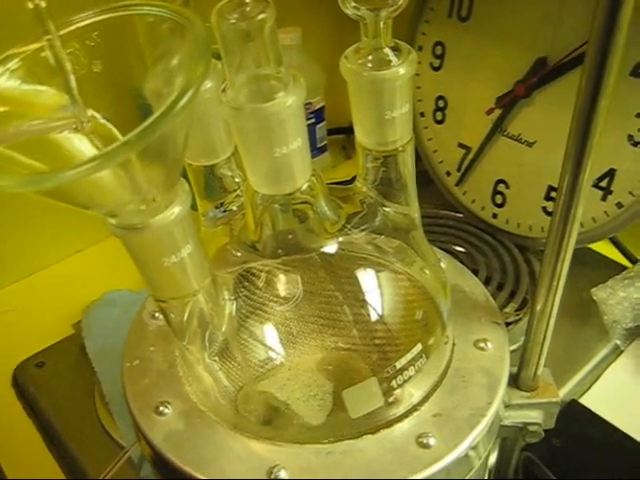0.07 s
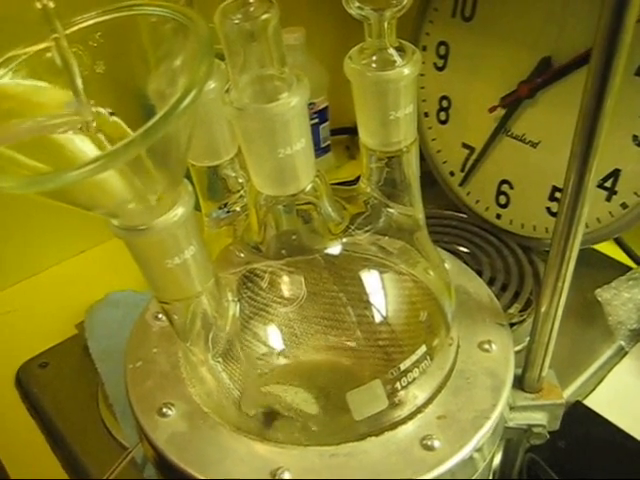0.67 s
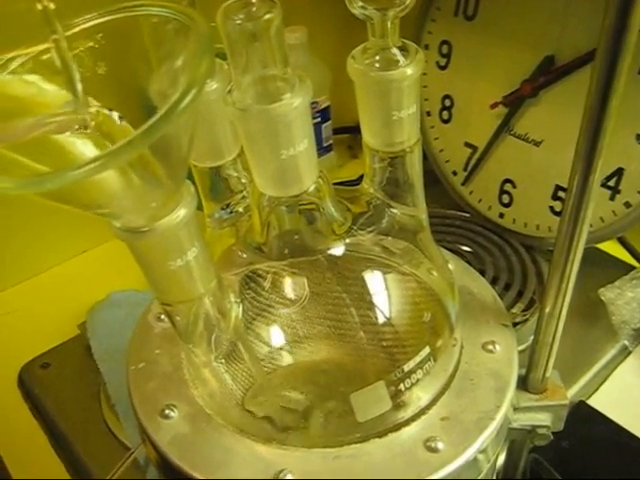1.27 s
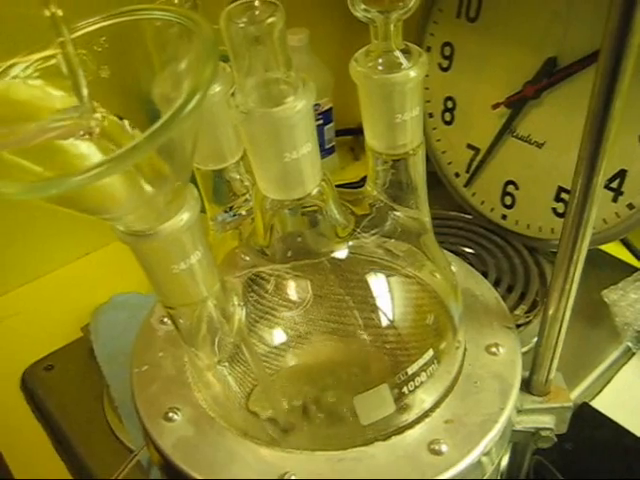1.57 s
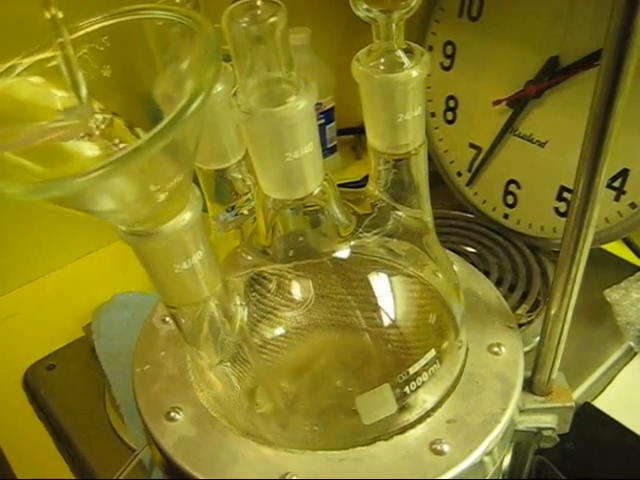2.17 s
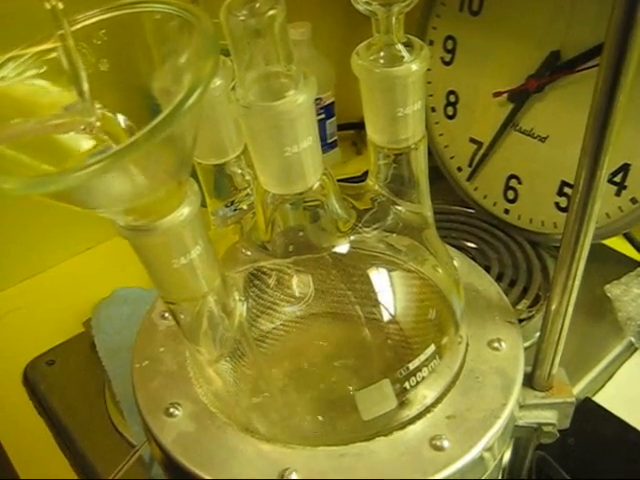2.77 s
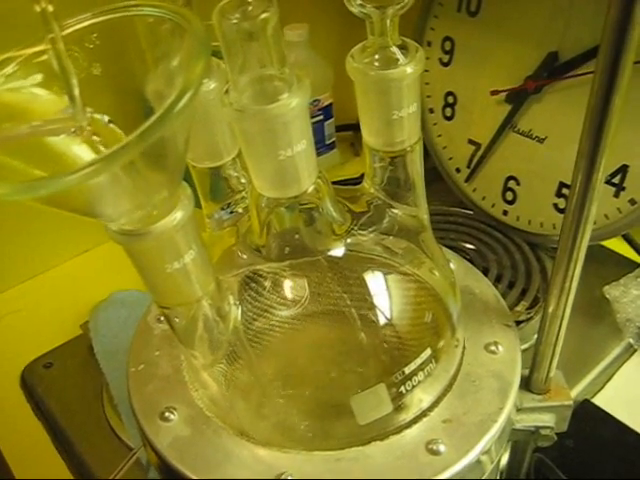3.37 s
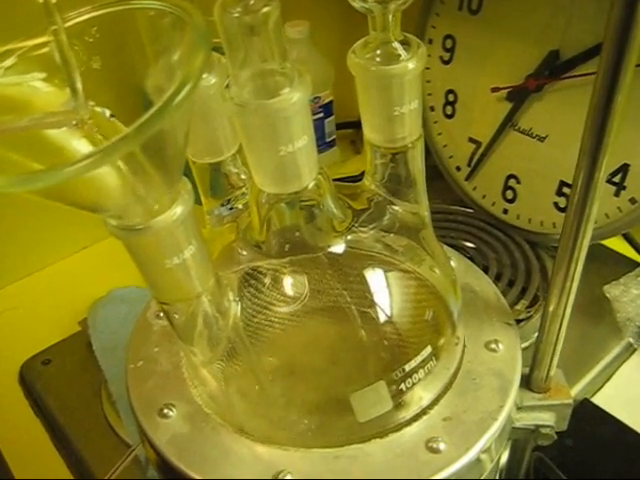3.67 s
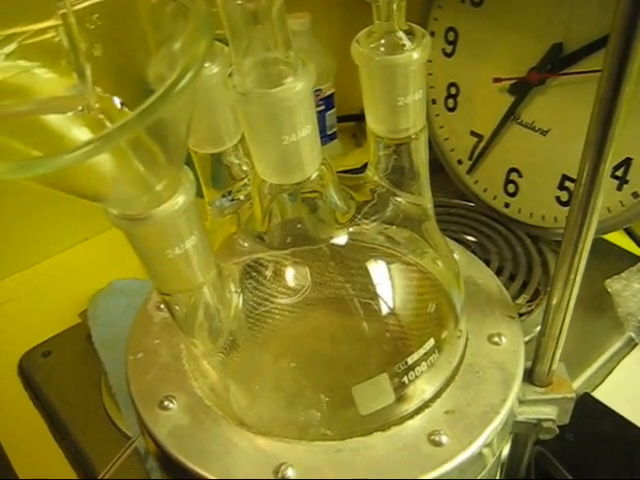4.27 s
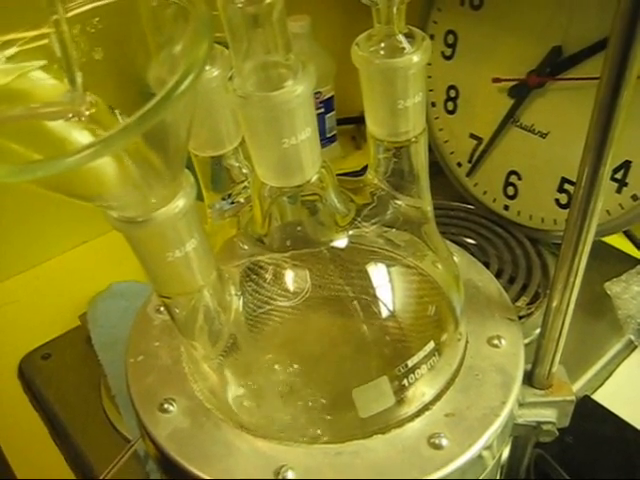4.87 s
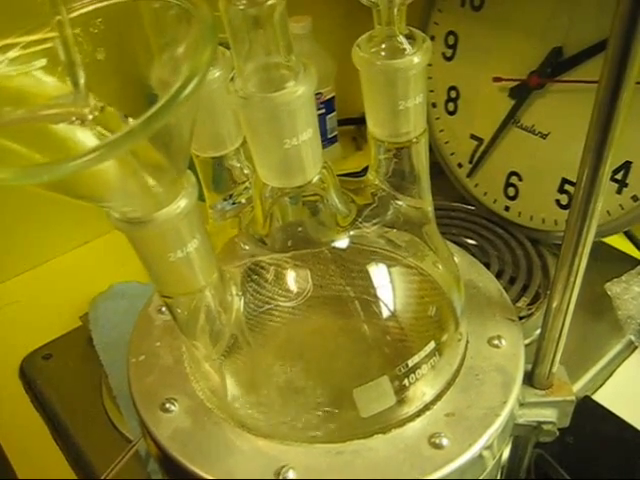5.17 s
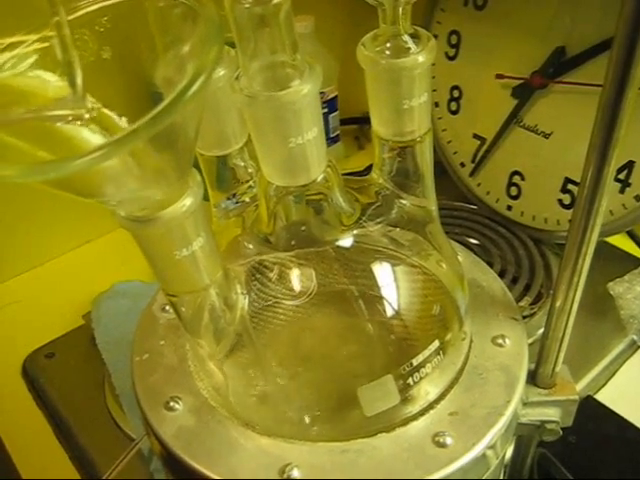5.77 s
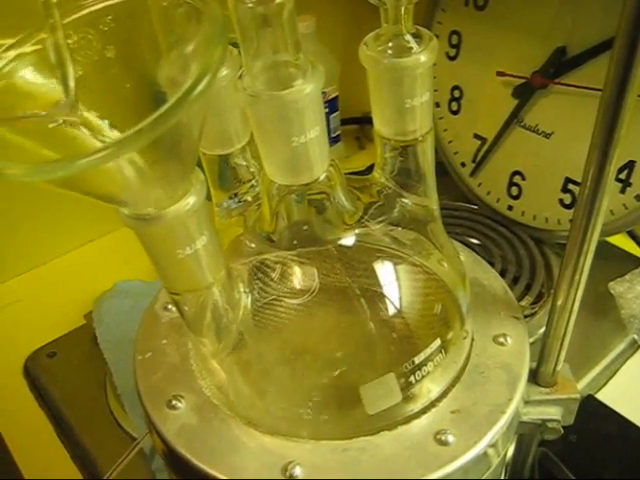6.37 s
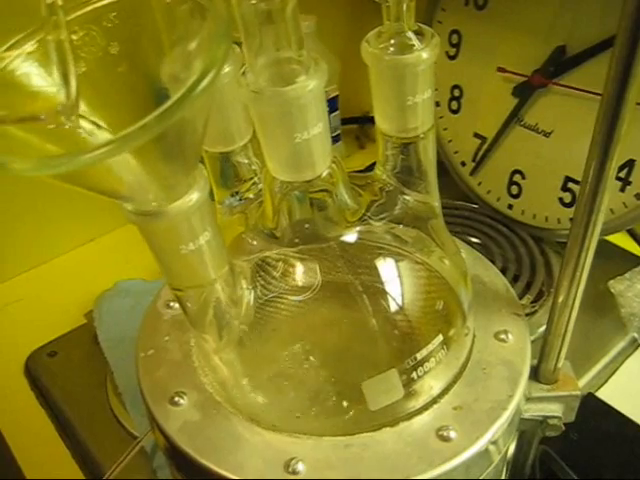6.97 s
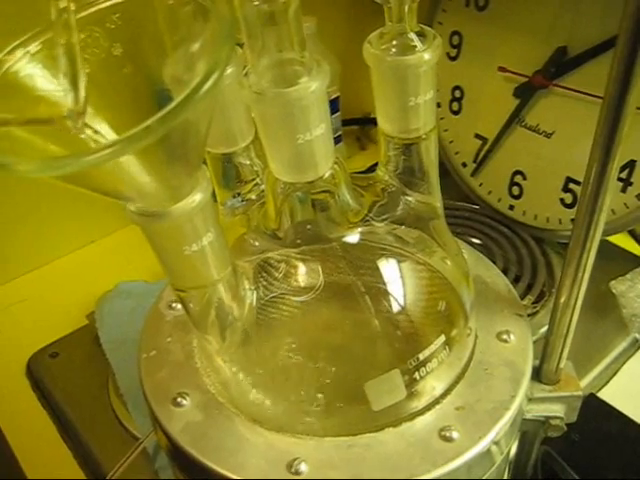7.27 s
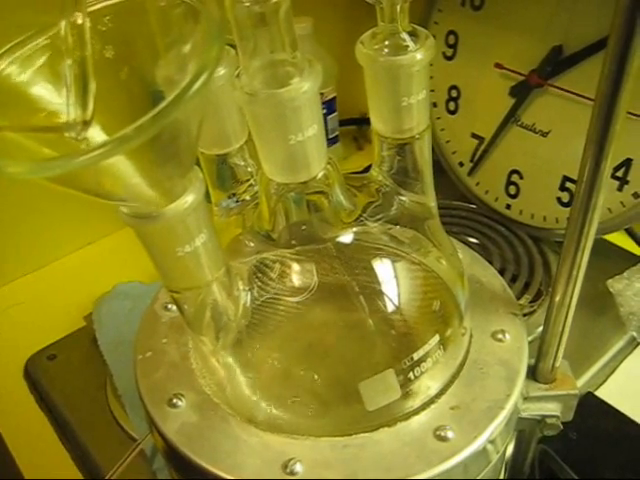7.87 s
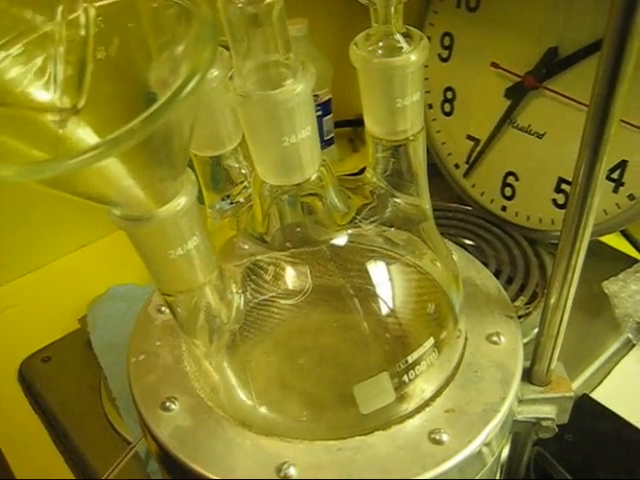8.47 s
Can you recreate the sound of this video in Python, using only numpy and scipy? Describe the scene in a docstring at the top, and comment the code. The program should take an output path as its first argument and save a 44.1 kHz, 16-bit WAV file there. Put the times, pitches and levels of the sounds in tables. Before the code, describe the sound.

Liquid trickles through a glass funnel into a flask, pattering and gurgling, with sharp glass clinks over a fume hood's hiss.

```python
"""A fume hood hisses throughout, and a small geared motor chirrs about eight times a second.
Right away, liquid trickles from a beaker through a glass funnel into a flask: drops patter on the funnel
and trap small ringing bubbles. Near 2 s the run-off gurgles, and soon the beaker clinks on the funnel.
From 3.5 s more pours follow, with more gurgling. From 5.8 s the beaker knocks the funnel again, harder.
The pouring stops near 7 s, and a last rising gurgle follows the final clinks."""
import sys
import numpy as np
from scipy import signal
from scipy.fft import rfft, irfft, next_fast_len
from scipy.io import wavfile

SR = 44100
rng = np.random.default_rng(int(sys.argv[2]) if len(sys.argv) > 2 else 0)


def master(y):
    """Save y as 16-bit WAV."""
    cut = np.clip(np.atleast_2d(y).T, -1, 1)
    pcm = np.round(cut * 32767)  # scale
    wavfile.write(sys.argv[1], SR, pcm.astype(np.int16))


N = 384111
TIME = np.arange(N) / SR

# Levels in the tables are relative. A fade_s is the time a ring takes to fall by 60 dB.
# Tone colour of the hood's hiss: pitch_hz, level_db
HOOD_COLOUR = [(25, -6.5), (60, -1.5), (120, -1.5), (250, -0.5), (500, -2), (1200, -3), (2200, -5),
               (4400, -5.5), (7500, -7.5), (8600, -13), (12000, -8), (13500, -15), (15500, -12)]
# Tones of the motor's gears: pitch_hz, level_db
GEAR_TONES = [(6352, -54), (6402, -59), (6440, -66), (6520, -58.5), (6593, -54), (6641, -62)]
# The motor's steady hum and whine: pitch_hz, level_db
MOTOR_WHINE = [(120, -71), (5399, -63.5), (15121, -62), (15150, -71)]
# Each tip of the beaker lets out a pour: start_s, length_s, end_level_db, swell_db
POURS = [(0.097, .21, -47, 9.5), (.92, .34, -39.5, 5), (1.459, .23, -41.5, 1), (3.487, .05, -41.5, 5.5),
         (3.702, .08, -38, 0), (3.87, .73, -42, 5.5), (4.642, .41, -38.5, -0.5), (5.189, .13, -33, 2),
         (6.254, .065, -33, 2), (6.438, .09, -34, 2), (6.68, .12, -43, 0)]
# Tone colour of the droplets' bubbles: pitch_hz, level_db
PATTER_COLOUR = [(800, -37), (1100, -26.5), (1650, -5.5), (2500, -5.5), (4200, -2), (5600, -7), (7800, -30),
                 (10000, -57)]
# Loudness of the liquid running down the funnel's stem: time_s, level_db
RUN_OFF_LEVELS = [(0, -60), (.6, -65), (1.1, -67), (2, -71.5), (3.45, -65), (3.8, -52.5), (4.15, -58),
                  (4.75, -50), (5.35, -57), (5.6, -68), (6.15, -63), (6.45, -50.5), (7.2, -57.5),
                  (7.6, -56.5), (8.7, -73.5)]
# Low tones of the funnel's glass, set ringing by the running liquid: pitch_hz, level_db
HOLLOW_TONES = [(298, -3.5), (335, -1), (800, -13)]
# The heaviest drops, each ringing a bubble or air pocket: start_s, ring_db, pitch_hz, hit_db
HEAVY_DROPS = [(0.0296, -18.5, 1550, -15), (0.1207, -12, 4540, -3.5), (0.2403, -7.5, 4470, -4.5),
               (0.4985, -20, 4083, -10.5), (0.8039, -20.5, 4175, -18), (0.9166, -17, 4000, -31),
               (1.1444, -12, 7350, -10), (1.198, -20.5, 1685, -10), (1.3136, -31, 1600, -4),
               (1.3199, -18.5, 3960, -1), (1.4644, -38, 1710, -3.5), (1.5137, -8.5, 3950, -32),
               (1.5622, -18.5, 1690, -27), (1.834, -20, 4170, -32), (3.471, -32, 1640, -8),
               (3.5106, -20.5, 4770, -2), (3.536, -17.5, 4900, -7), (3.7047, -23.5, 1560, -13),
               (3.7298, -13, 1616, -22), (3.7524, -16, 1690, -14), (3.793, -18.5, 3960, -16),
               (4.0443, -21, 3840, -31), (4.4744, -17.5, 3700, -13), (4.5696, -14.5, 4840, -10),
               (4.7252, -17, 7750, 0.5), (4.772, -19, 1670, -20), (4.9212, -23, 1760, 0),
               (5.0262, -16, 5270, -26), (5.1016, -50, 1590, 0), (5.1964, -18, 3920, -6),
               (5.2598, -20, 3960, 0), (5.289, -21, 4900, -11), (5.315, -12, 11700, -13),
               (6.2687, -22.5, 1780, 1)]
# Strings of bubbles, gliding as they grow or shrink: start_s, length_s, level_db, first_hz, last_hz
GURGLE_RUNS = [(1.859, .27, -38, 2270, 2430), (3.876, 0.86, -43.5, 984, 700), (4.799, 0.69, -46, 1220, 595),
               (6.022, 0.058, -31.5, 2330, 2710), (6.418, 0.6, -47.5, 840, 650),
               (6.902, .14, -39, 2680, 2950), (7.132, 0.058, -32.5, 1414, 1564),
               (7.191, 0.047, -33, 590, 604), (7.257, 0.171, -39.5, 1420, 826),
               (8.06, .58, -38, 1466, 3150)]
# The beaker meets the funnel at spot 0, 1 or 2 (upper_db sets its upper tone against its lower one):
# start_s, funnel_db, beaker_db, upper_db, crack_db, free_ring_s, spot
CLINKS = [(2.6672, -8, -29, -5, -8, 0.008, 0), (2.8353, -19, -32, -18, -19, 0.0027, 0),
          (5.7835, 0, -25, 5.5, -1, 0.0046, 1), (6.4871, 1, -15.5, -10, -6, 0.0034, 1),
          (6.7642, -15.5, -25.5, -14, -29, 0.0067, 1), (7.4813, 1.5, -14, -5, 1, 0.12, 2),
          (7.5414, -10.5, -26, 3, -6, 0.0039, 2), (7.5507, -12.5, -21.5, -4.5, -35, 0.0078, 2),
          (7.5760, -19, -50, -7, -14, 0.0027, 2), (7.8049, 2, -16.5, 1, 8.5, 0.02, 2),
          (7.985, -22.5, -50, 0, -40, .003, 1), (8.086, -24, -57, -6, -40, .003, 1)]
# Tones of funnel and flask, by where they are struck: pitch_hz, fade_s, spot0_db, spot1_db, spot2_db
FUNNEL_TONES = [(285, 0.3, -30, -35, -34), (345, 0.16, -24, -37, -37), (800, 0.25, -41, -38, -36),
                (1322, 0.2, -41, -42, -36), (1590, 0.12, -24, -31, -29), (1680, 0.15, -26, -23, -36),
                (1740, 0.14, -25, -24, -24), (1778, 0.15, -19, -24, -24), (1997, 0.14, -22, -30, -29),
                (2845, 0.09, -26, -22, -23), (2955, 0.11, -24, -24, -25), (3526, 0.1, -19, -25, -33),
                (3603, 0.14, -14, -26, -33), (3642, 0.1, -25, -24, -27), (3740, 0.17, -25, -28, -23),
                (3840, 0.09, -38, -22, -23), (3982, 0.14, -38, -26, -41), (4105, 0.18, -31, -31, -30),
                (4265, 0.13, -39, -45, -20), (4370, 0.09, -37, -33, -21), (4616, 0.11, -32, -25, -27),
                (4686, 0.08, -35, -22, -34), (4788, 0.11, -39, -40, -24), (6450, 0.07, -26, -27, -27),
                (7400, 0.06, -57, -42, -47), (10490, 0.1, -53, -45, -33), (10960, 0.1, -41, -37, -30)]
# The beaker's tones, free or pressed on the funnel: free_hz, pressed_hz, free_fade_s, pressed_fade_s
BEAKER_TONES = [(2630, 2720, .55, .08), (6190, 6235, .26, .085)]


def from_db(db):
    """Turn decibels into a number to multiply by."""
    return 10 ** (np.asarray(db) / 20)


def unit_level(x):
    """Scale a sound so that its average power is 1."""
    return x / np.sqrt(np.mean(x ** 2) + 1e-20)


def level_at(colour, hz):
    """Look up a tone colour's level in dB at any pitch."""
    pitches, levels = np.transpose(colour)
    return np.interp(np.log(hz + 1e-3), np.log(pitches), levels)


def band(x, low_hz, high_hz, order=2):
    """Keep the part of a sound between two pitches."""
    sos = signal.butter(order, [low_hz, min(high_hz, .45 * SR)], "band", fs=SR, output="sos")
    return signal.sosfilt(sos, x + 1e-18)


def add(out, start_s, sound):
    """Mix a sound in at a given time."""
    i = int(np.clip(round(start_s * SR), 0, N))
    out[i:i + len(sound)] += sound[:N - i]


def drift(turns_per_s):
    """A random wobble of typical size 1."""
    points = rng.standard_normal(4096)
    return unit_level(np.interp(TIME * turns_per_s, np.arange(len(points)), points))


def ring(clicks, hz, fade_s):
    """Each click starts a fading tone as strong as itself."""
    keep, angle = from_db(-60 / (fade_s * SR)), 2 * np.pi * hz / SR
    return signal.lfilter([0, np.sin(angle)], [1, -2 * keep * np.cos(angle), keep * keep], clicks + 1e-18)


def hood_air(level_db=-46):
    """Air drawn through the hood makes an even hiss."""
    size = next_fast_len(N)
    colour = from_db(level_at(HOOD_COLOUR, np.arange(size // 2 + 1) * SR / size))
    hiss = irfft(rfft(rng.standard_normal(size)) * colour, size)[:N]
    return from_db(level_db) * unit_level(hiss)


def tones(rows, wander):
    """Steady tones that waver slightly."""
    return sum(np.sqrt(2) * from_db(db) * np.sin(2 * np.pi * hz * TIME + wander * drift(5.7))
               for hz, db in rows)


def motor(turn_hz=7.907, peak_s=.079, chirr_db=-51, gears_db=-2, throb_db=5, flutter=0.3):
    """The gears' chirr swells once and flutters five times each turn, over a steady hum and whine."""
    turn = 2 * np.pi * turn_hz * (TIME - peak_s)
    swell = unit_level(from_db(throb_db * np.cos(turn)) * (1 + flutter * np.cos(5 * turn)))
    chirr = from_db(chirr_db) * unit_level(band(rng.standard_normal(N), 6150, 6700))
    gears = from_db(gears_db) * tones(GEAR_TONES, wander=0.9)
    return swell * (chirr + gears) + tones(MOTOR_WHINE, wander=1.0)


def fizz(level_db=-59, per_s=170, count=9):
    """Tiny bursting bubbles tick high up, thinning out as time passes."""
    clicks = rng.uniform(-0.63, 1, N) * (rng.random(N) < per_s * np.exp(-TIME / 5) / SR)
    group = rng.integers(0, count, N)
    pitches = np.geomspace(8500, 13000, count)
    pops = sum(ring(clicks * (group == k), hz, fade_s=0.015) for k, hz in enumerate(pitches))
    return from_db(level_db) * unit_level(pops)


def flow(seep_db=-66, open_s=.02, close_s=.035, dribble_db=-15, dribble_s=.45):
    """Strength of the trickle: each pour opens, swells and stops, and the wet funnel dribbles on."""
    power = from_db(seep_db) ** 2
    for start, length, db, swell_db in POURS:
        opening = np.clip((TIME - start) / open_s, 0, 1)
        to_come = np.clip(1 - (TIME - start) / length, 0, 1)
        after = np.maximum(TIME - start - length, 0)
        closing = np.maximum(np.exp(-after / close_s), from_db(dribble_db) * np.exp(-after / dribble_s))
        power = power + (from_db(db - swell_db * to_come) * opening * closing) ** 2
    return np.sqrt(power)


def funnel_tick(clicks, cone_hz=1660, cone_fade_s=0.022, cone_db=-20):
    """A drop's sharp tick, coloured by the hollow of the funnel's cone."""
    return band(clicks + from_db(cone_db) * ring(clicks, cone_hz, cone_fade_s), 1050, 10500)


def patter(level_db=-3, peak_per_s=1150, spread_db=5.5, spray_db=-4, cycles=3.2, count=26):
    """Countless droplets of every size hit the funnel; a stronger trickle brings more and louder ones."""
    trickle = flow()
    busy = np.sqrt(trickle / trickle.max())
    sizes = from_db(spread_db * np.minimum(rng.exponential(1, N), 3))
    clicks = rng.choice([-1, 1], N) * (rng.random(N) < peak_per_s * busy / SR) / np.sqrt(busy)
    group = rng.integers(0, 4 * count, N)  # one in four traps a bubble, the rest only tick
    bubbles = 0
    for k, hz in enumerate(np.geomspace(900, 11000, count)):
        gain = from_db(level_at(PATTER_COLOUR, hz)) * hz  # high bubbles are brief, so they get a boost
        bubbles = bubbles + gain * ring(clicks * sizes * (group == k), hz, np.log(1000) * cycles / hz)
    spray = funnel_tick(clicks * np.sqrt(sizes) * (group >= count))
    return from_db(level_db) * trickle * (unit_level(bubbles) + from_db(spray_db) * unit_level(spray))


def bubble(hz, cycles, rise):
    """A trapped bubble swells quickly, rings on, and rises in pitch as it nears the surface."""
    t = TIME[:int(5 * cycles / hz * SR)]
    age = t * hz / cycles
    pitch_hz = hz * (1 + rise * np.tanh(age / 2))
    return (1 - np.exp(-2 * t * hz)) * np.exp(-age) * np.sin(2 * np.pi * np.cumsum(pitch_hz) / SR)


def run_off(hollow_db=-2.5, glug_db=6, count=800):
    """Soft low bubbles form in the funnel's stem; the funnel's low glass tones answer in uneven glugs."""
    burble = np.zeros(N)
    for when, size, strength in rng.random((count, 3)):
        note = bubble(1400 * 2 ** (-1.4 * size), cycles=10, rise=.08)
        add(burble, when * N / SR, strength * note * 2 ** -size)
    glugs = from_db(glug_db * drift(21))
    hollow = sum(from_db(db) * ring(rng.standard_normal(N), hz, fade_s=.055) for hz, db in HOLLOW_TONES)
    level = from_db(np.interp(TIME, *np.transpose(RUN_OFF_LEVELS)))
    return level * band(unit_level(burble) + from_db(hollow_db) * unit_level(glugs * hollow), 226, 3100)


def light_drops(count=90, bubble_share=.3, spread_db=4, low_hz=3630, high_hz=8100, slap_hz=1600):
    """A lighter drop breaks off whenever enough liquid has run; gives rows like HEAVY_DROPS."""
    strength = flow() / flow().max()
    poured = np.cumsum(strength ** 1.05)
    chances, lucks = rng.random((count, 3)), rng.standard_normal(count)
    rows = []
    for k, (late, kind, size) in enumerate(chances):
        at = np.searchsorted(poured, poured[-1] * (k + late) / count)
        db = 20 * np.log10(strength[at] ** 0.25) + spread_db * lucks[k]
        if kind < bubble_share:  # falls into liquid and traps a bubble
            rows.append((at / SR, db - 18.5, low_hz * (high_hz / low_hz) ** size, db - 30))
        else:  # slaps bare glass and stirs the air in the cone
            rows.append((at / SR, db - 29.5, slap_hz * 2 ** (1.1 * (size - .5)), db - 8))
    return rows


def drops(tick_db=-3, splash_db=-12, splash_s=0.0047, splash_per_s=1500):
    """Each drop ticks on the glass and breaks into a brief splash; both shake a short-lived bubble."""
    bubbles, ticks, t = np.zeros(N), np.zeros(N), TIME[:SR // 20]
    for start, ring_db, hz, hit_db in list(HEAVY_DROPS) + light_drops():
        specks = rng.standard_normal(len(t)) * (rng.random(len(t)) < splash_per_s / SR)
        strike = (t == 0) + from_db(splash_db) * specks * np.exp(-t / splash_s)
        note = bubble(hz, cycles=4, rise=.03)
        add(bubbles, start, from_db(ring_db) * signal.fftconvolve(strike, note))
        add(ticks, start, from_db(hit_db) * strike)
    return bubbles + from_db(tick_db) * funnel_tick(ticks)


def gurgles(level_db=-5, clusters_per_s=18, cluster_s=.018, scatter=0.28, per_cluster=4):
    """Bubbles in the run-off come in small clusters of nearly equal size, one after another."""
    out = np.zeros(N)
    for start, length, db, first_hz, last_hz in GURGLE_RUNS:
        chances = rng.random((SR // 1000, per_cluster, 2))
        for step, cluster in zip(np.arange(0, length * clusters_per_s), chances):
            age = (step + (step > 0) * (cluster[0, 0] - .5)) / clusters_per_s  # slightly uneven timing
            hz = first_hz * (last_hz / first_hz) ** (age / length)
            for k, (delay, size) in enumerate(cluster):
                note = bubble(hz * (1 + scatter * (size - .5)), cycles=8, rise=.02)
                add(out, start + age + cluster_s * delay * (k > 0), from_db(db + level_db) * note)
    return out


def beaker_ring(free_s, upper_db, settle_s=0.0077):
    """The beaker sings until it settles on the funnel, which muffles it and raises its pitch."""
    t = TIME[:SR // 2]
    pressed = .5 + .5 * np.tanh((t - free_s) / settle_s)
    out = 0
    for (free_hz, pressed_hz, free_fade_s, pressed_fade_s), db in zip(BEAKER_TONES, (0, upper_db)):
        hz = free_hz + pressed * (pressed_hz - free_hz)
        loss = np.log(1000) * np.cumsum((1 - pressed) / free_fade_s + pressed / pressed_fade_s) / SR
        out = out + from_db(db) * np.exp(-loss) * np.sin(2 * np.pi * np.cumsum(hz) / SR)
    return out


def clinks(funnel_trim_db=-1, crack_hz=3100, rattle_db=-19, rattle_s=0.0049, knock_db=-27, knock_s=0.045):
    """Glass hits glass with a hard crack; both sides ring, and the funnel rattles in its joint."""
    out, t, table = np.zeros(N), TIME[:SR // 2], np.array(FUNNEL_TONES)
    hz, fade_s = table[:, :1], table[:, 1:2]
    fading_tones = np.exp(-np.log(1000) * t / fade_s) * np.sin(2 * np.pi * hz * t)
    for start, funnel_db, beaker_db, upper_db, crack_db, free_s, spot in CLINKS:
        strengths = from_db(table[:, 2 + int(spot)]) * rng.choice([-1, 1], len(table))
        crack = band(ring(t == 0, crack_hz, fade_s=0.0018), 1240, 20000)
        rattle = band(rng.standard_normal(len(t)), 990, 5500, order=3) * np.exp(-t / rattle_s)
        knock = band(rng.standard_normal(len(t)), 160, 1400) * np.exp(-t / knock_s)
        funnel = strengths @ fading_tones + from_db(knock_db) * knock + from_db(rattle_db) * rattle
        add(out, start, from_db(funnel_db + funnel_trim_db) * funnel)
        add(out, start, from_db(beaker_db) * beaker_ring(free_s, upper_db) + from_db(crack_db) * crack)
    return band(out, 140, 18000)  # small glassware gives off no bass


def hood_echo(x, fade_s=0.074, first_s=0.001068):
    """Sound bounces off the hood's close walls in a short, dense echo."""
    t = TIME[:SR // 2]
    bounces = rng.standard_normal(len(t)) * (t > first_s)
    tail = band(bounces, 260, 9000, order=1) * np.exp(-np.log(1000) * t / fade_s)
    return signal.fftconvolve(x, tail / np.sqrt(np.sum(tail ** 2)))[:N]


def scene(liquid_echo_db=-8, glass_echo_db=-18, deep_echo_db=-2):
    """Liquid and glass close by, over air and motor; sounds from deep in the flask echo more."""
    liquid = drops() + patter() + fizz()
    deep = gurgles() + run_off()
    glass = clinks()
    echo = hood_echo(from_db(liquid_echo_db) * liquid + from_db(deep_echo_db) * deep
                     + from_db(glass_echo_db) * glass)
    return (liquid + deep + glass + echo + motor() + hood_air())[None]


def record(dry, cutoff_hz=15500):
    """Flatten the loudest peaks and cut the highest treble."""
    treble_cut = signal.ellip(10, .1, 70, cutoff_hz, fs=SR, output="sos")
    return signal.sosfilt(treble_cut, np.clip(dry, -1, 1))


dry = scene()
out = record(dry)
master(out)
```